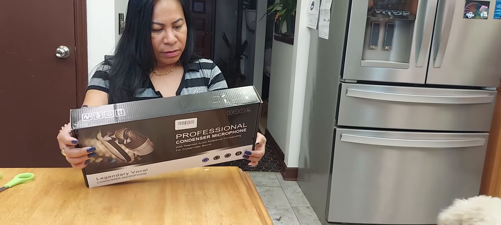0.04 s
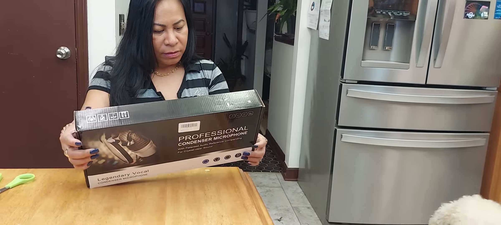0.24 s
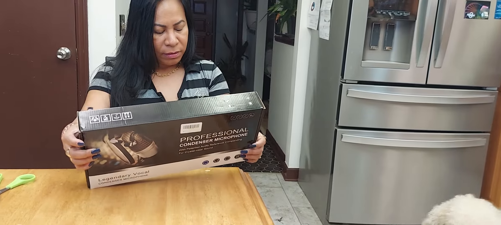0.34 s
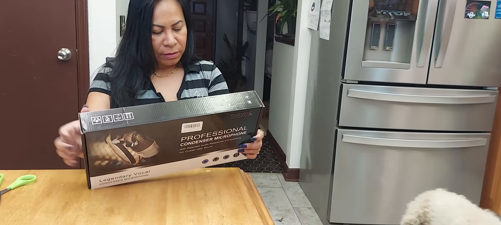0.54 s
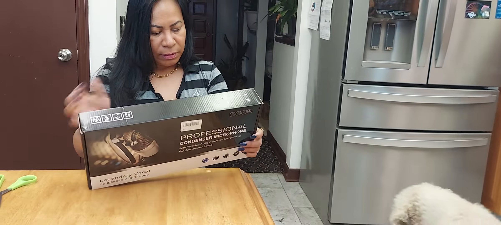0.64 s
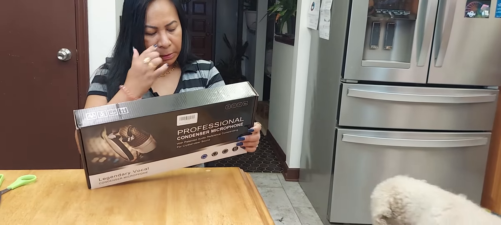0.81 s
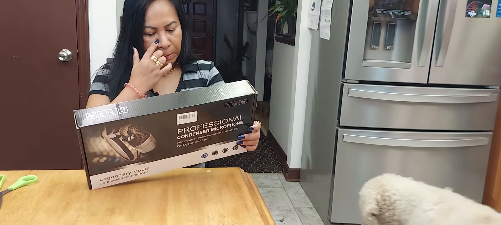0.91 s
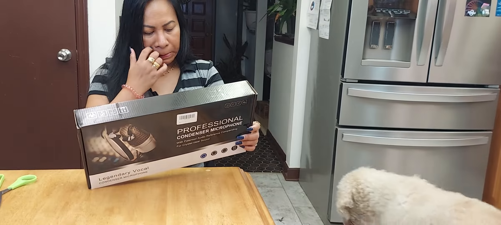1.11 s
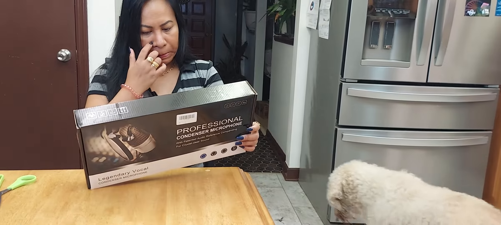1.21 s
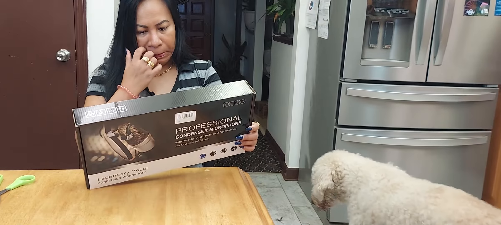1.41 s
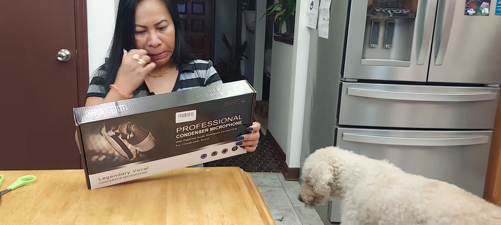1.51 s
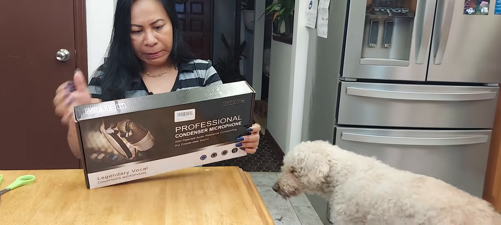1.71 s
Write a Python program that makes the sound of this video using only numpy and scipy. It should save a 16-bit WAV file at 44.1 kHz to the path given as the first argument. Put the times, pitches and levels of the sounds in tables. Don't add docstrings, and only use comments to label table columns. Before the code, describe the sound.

Hard nail clicks and soft finger bumps on a cardboard box, fridge humming faintly behind

```python
import sys
import numpy as np
from scipy import signal
from scipy.fft import rfft, irfft, next_fast_len
from scipy.io import wavfile
from scipy.ndimage import uniform_filter1d

SR = 44100
rng = np.random.default_rng(int(sys.argv[2]) if len(sys.argv) > 2 else 0)


def voltage_ratio(decibels):
    exponent = np.asarray(decibels, float) / 20
    return 10 ** exponent


def persist_wave(psi):
    counts = np.round(np.clip(psi, -1, 1) * 32767).astype(np.int16)
    wavfile.write(sys.argv[1], SR, np.atleast_2d(counts).T)


N = 77175

# f/Hz, density/dB
HISS_SPECTRUM = [(15, -51.5), (30, -32), (70, -7.5), (150, -18), (600, -19.5), (850, -36.5), (2500, -41),
                 (16000, -48.5)]
# f/Hz, width/Hz, level/dB
FRIDGE_BANDS = [
    (76.9, 30, -80),
    (1560, 150, -78.5),
    (13180, 2500, -81),
]
# f/Hz, correlation/1
LIKENESS = [(60, .6), (200, 0.52), (700, 0.94), (1500, 0.17), (5000, 0.1), (16000, .1)]
# f/Hz, gain/dB
PORT_COLOUR = [(6500, -3.5), (7800, 5.5), (9300, -5.5), (11000, -2), (13300, 0.5), (15500, 1)]
# f/Hz, gain to the left/dB
LEFT_GAIN = [(60, 1.5), (300, 1), (700, 0), (3000, 0.5), (8000, -1.1)]
# f/Hz, density/dB
TAIL_SPECTRUM = [(120, -69), (300, -18), (1100, -19.5), (1520, -5), (2800, -9), (3800, -4.5), (6000, -6.5),
                 (16500, -17)]
# f/Hz, t60/s
ROOM_T60 = [(300, 0.79), (1500, 0.5), (4000, 0.39), (8000, 0.32), (14000, 0.3)]
# delay/s, peak over tail/dB
WALL_ECHOES = [
    (.0073, 8),
    (.0143, 4),
]
# t of top/s, swell/s, fall/s, level/dB, brightness tilt/(dB/octave), shine/dB
FINGER_SLIDES = [
    (.4, .1, .07, -62, 4, 6),
    (.497, .04, .08, -55, 0, 5),
    (.2, .04, .05, -74, 1.5, 0),
    (1.165, .04, .09, -64, -7, 0),
    (1.75, .03, .05, -61, -2, 0),
    (1.19, .03, .05, -75, 3, 8),
    (1.145, .015, .02, -76, 3, 8),
    (.5, .05, .08, -64, -10, 0),
    (.645, .03, .05, -80, 3, 8),
    (1.742, .015, .02, -65, -10, 0),
]
# t/s, level/dB, f/Hz, t60/s, rise/s
BOX_GRIPS = [(.0, -55.5, 520, 0.98, 0.072), (.09, -58, 503, 0.55, 0.0023), (.207, -49.5, 435, 0.34, 0.0023),
             (0.233, -54.5, 564, 0.83, 0.0037), (.234, -46, 1460, 0.33, 0.0073),
             (0.051, -63, 208, 0.67, 0.023), (0.289, -52, 294, 0.31, 0.0071),
             (0.352, -58, 488, 0.25, 0.005), (.478, -61, 600, 0.33, 0.0034), (.79, -71, 1900, .3, .003),
             (.608, -68, 1420, 0.5, .003), (0.788, -67, 850, .25, .003), (1.15, -63, 1950, .35, .01),
             (-.01, -56, 1600, .4, .003), (0.85, -61.5, 1500, 0.16, 0.0018), (1.189, -70, 389, 0.29, 0.021),
             (1.415, -51, 780, 0.19, 0.013), (1.42, -38, 2200, 0.24, 0.013), (1.636, -69, 484, 0.4, 0.0035),
             (1.712, -61, 475, 0.56, .004)]
# t/s, level/dB, f/Hz, t60/s, rise/s
PANEL_TONES = [
    (1.412, -53.5, 1200, 0.32, 0.0094),
    (1.412, -53, 2080, 0.13, 0.0074),
    (1.41, -43, 2410, 0.22, 0.011),
    (1.412, -40.5, 3400, 0.24, 0.017),
    (.235, -45, 2050, 0.19, 0.0037),
    (.235, -48, 1500, 0.48, 0.005),
    (.878, -60, 1230, 0.3, 0.0066),
    (1.155, -67, 1900, 0.33, .005),
    (1.6375, -59.5, 1457, 0.15, .001),
]
# t/s, peak/dB, f/Hz, length/s
SMALL_TICKS = [(.160, -70, 4700, .0012), (.160, -69, 7700, .001), (.191, -67, 4700, .0012),
               (.191, -68, 7500, .001), (.215, -68, 4600, .0012), (.2372, -27, 11300, .0002),
               (.2361, -31, 7300, .0003), (.4705, -53, 4500, .0003), (.5097, -55, 13200, .0003),
               (.8826, -24, 7600, .00015), (.8838, -36, 5000, .0003), (.8928, -31, 7600, .0003),
               (.9412, -30, 11800, .0002), (.9494, -31, 7400, .0003), (1.4071, -40, 11000, .0002),
               (1.4100, -41, 11000, .0002), (1.4149, -30, 7600, .0003), (1.4181, -36, 7600, .0004),
               (1.4210, -35, 7600, .0005), (1.4227, -33, 4000, .0002), (1.4305, -35, 7600, .0003),
               (1.4356, -34, 6000, .0002), (1.7110, -52, 520, .0006), (1.7110, -58, 1800, .0004),
               (1.7110, -66, 4200, .0003), (1.7110, -66, 7500, .0003), (1.6385, -56, 1450, .0012),
               (.8525, -59, 1500, .0008)]
# t/s, peak/dB, f/Hz, length/s
BOX_BUMPS = [(.075, -60, 535, .015), (.103, -57, 415, .012), (.115, -61, 665, .015), (.16, -61, 505, .008),
             (.222, -56, 400, .008), (.242, -51, 525, .007), (.241, -54, 690, .006), (.277, -49, 200, .012),
             (.25, -56, 86, .015), (.305, -56, 395, .01), (.368, -55, 285, .008), (.37, -54, 480, .008),
             (.49, -54, 640, .01), (.488, -57, 480, .008), (.52, -63, 430, .02), (.8, -64, 710, .008),
             (.827, -62, 520, .006), (.855, -62, 320, .006), (.855, -64, 700, .005), (1.01, -66, 400, .006),
             (1.21, -65, 390, .02), (1.165, -64, 1590, .008), (1.432, -54, 786, .012),
             (1.47, -58, 1110, .015), (1.425, -55, 1340, .012), (1.44, -49, 1870, .025),
             (1.73, -59, 510, .012), (1.725, -63, 340, .012), (1.67, -65, 500, .006),
             (.89, -55, 1530, .012), (.105, -62, 300, .015), (.49, -60, 78, .02), (.6, -66, 80, .02),
             (.77, -65, 82, .02), (.65, -70, 150, .015)]
# f/Hz, gain/dB
NAIL_SPECTRUM = [(300, -21), (1000, -8), (1600, -0.5), (2800, -33), (4500, -4.5), (8000, 5.5), (10000, 1),
                 (16000, -19.5)]
# t/s, direct/dB, port ring/dB, room/dB, brightness tilt/(dB/octave)
NAIL_CLICKS = [(.2310, -22, -9.5, -36, 2.5), (.2352, -22, -5.5, -34.5, 2), (.2370, -34, -19, -50, 6),
               (.2422, -39.5, -25, -76, 3), (.4706, -66, -44, -71, 4.5), (0.8491, -66, -80, -72, -11),
               (0.8668, -57, -50, -75, 4), (.8755, -25.5, -25, -37, 0.5), (.8774, -24.5, -24, -50, 2),
               (.9412, -23, -25, -42, 2), (1.0063, -48, -55, -63.5, -4), (1.0370, -55.5, -48, -80, -4),
               (1.4071, -38, -42, -43, -0.5), (1.4100, -38, -44, -43, -1), (1.7110, -60, -65, -72, -4)]
# t/s, level/dB, rise/s, brightness tilt/(dB/octave), shine/dB
FAR_SCUFFS = [
    (-.03, -46.5, 0.0041, -4, -4),
    (0.16, -74, 0.0021, 12, -5),
    (0.188, -57, 0.013, -5.5, 21.5),
    (.24, -35.5, 0.016, 6.5, 1.5),
    (0.479, -68.5, 0.014, 2, 8),
    (.63, -76, 0.0054, 5, 6.5),
    (1.15, -65, 0.0052, -4, 10.5),
    (1.412, -37.5, 0.0059, 2, -15.5),
    (1.734, -58.5, 0.0065, 10.5, 15.5),
]

TOP_HZ = 15850
LAG_S = np.array([[.00018], [0]])
LEFT_RIGHT = np.array([[1], [-1]])


def unit(x):
    return x / np.sqrt(np.mean(x ** 2) + 1e-20)


def along(points, hz):
    f, v = np.transpose(points)
    return np.interp(np.log(hz + 1), np.log(f + 1), v)


def tilt(hz, db_per_octave):
    return voltage_ratio(db_per_octave * np.log2(np.clip(hz, 300, None) / 4000))


def shine(hz, db):
    return voltage_ratio(db * np.clip(hz / 4000 - 2, 0, 1))


def filtered(x, response):
    m = next_fast_len(x.shape[-1] + 2048)
    spectrum = rfft(x, m) * response(np.fft.rfftfreq(m, 1 / SR))
    return irfft(spectrum, m)[..., :x.shape[-1]]


def flicker(size, count):
    return unit(uniform_filter1d(rng.standard_normal(count), size=size))


def decay(db, t60_s, rise_s, t):
    return voltage_ratio(db - 60 * t / np.clip(t60_s, .05, .55)) * (1 - np.exp(-t / rise_s))


def noise(gain, size):
    def mid_side_gain(hz):
        turn = np.arccos(np.clip(along(LIKENESS, hz), -1, 1)) / 2
        colour = gain(hz) * voltage_ratio(along(PORT_COLOUR, hz)) * (hz < TOP_HZ)
        return colour * np.array([np.cos(turn), np.sin(turn)])

    mid, side = filtered(rng.standard_normal((2, size)), mid_side_gain)
    left = np.roll(mid + side, round(LAG_S[0, 0] * SR))
    return unit(np.array([left, mid - side]))


def add(out, x, s):
    i = round(s * SR)
    x = x[:, max(-i, 0):N - i]
    out[:, max(i, 0):max(i, 0) + x.shape[1]] += x


def kitchen():
    out = voltage_ratio(-70.5) * noise(lambda f: voltage_ratio(along(HISS_SPECTRUM, f)), size=N)
    for hz, width_hz, db in FRIDGE_BANDS:
        out += voltage_ratio(db) * noise(lambda f: np.exp(-((f - hz) / width_hz) ** 2), size=N)
    return out


def room_tail(tilt_db, rise_s, shine_db=0):
    x = noise(lambda hz: voltage_ratio(along(TAIL_SPECTRUM, hz)) * tilt(hz, tilt_db) * shine(hz, shine_db),
              size=SR * 3 // 4)
    hz, frame_s, z = signal.stft(x, SR, nperseg=256)
    fade = voltage_ratio(-60 * frame_s / along(ROOM_T60, hz)[:, None])
    x = signal.istft(z * fade, SR, nperseg=256)[1]
    t = np.arange(x.shape[1]) / SR
    clump_db, clump_s = 3, .06
    clumps_db = clump_db * np.exp(-t / clump_s) * flicker(size=30, count=len(t))
    return filtered(x * voltage_ratio(clumps_db) * (1 - np.exp(-t / rise_s)), lambda hz: hz < TOP_HZ)


def far_scuffs():
    out = np.zeros((2, N))
    for s, db, rise_s, tilt_db, shine_db in FAR_SCUFFS:
        add(out, voltage_ratio(db) * room_tail(tilt_db, rise_s, shine_db), s)
    return out


def finger_slides():
    out, t = np.zeros((2, N)), np.arange(-SR // 4, SR // 4) / SR
    edge_db, grain_db = -18, 1.5
    for top_s, rise_s, fall_s, db, tilt_db, shine_db in FINGER_SLIDES:
        swell_db = edge_db * np.where(t < 0, -t / rise_s, t / fall_s)
        swell_db += grain_db * flicker(size=90, count=len(t))
        rustle = noise(lambda hz: tilt(hz, tilt_db) * shine(hz, shine_db) * (hz > 700), size=len(t))
        add(out, voltage_ratio(db + swell_db) * rustle, top_s + t[0])
    return filtered(out, lambda hz: hz < TOP_HZ)


def cupboard_panels():
    out, t = np.zeros((2, N)), np.arange(SR // 2) / SR
    wander_rad = .9
    for s, db, hz, t60_s, rise_s in PANEL_TONES:
        drift = unit(uniform_filter1d(rng.standard_normal((2, len(t))), size=600, axis=1))
        phase = 2 * np.pi * hz * (t - LAG_S) + wander_rad * (drift[0] + drift / 3)
        add(out, decay(db, t60_s, rise_s, t) * np.sqrt(2) * np.sin(phase), s)
    return out


def box_grips():
    out, t = np.zeros((2, N)), np.arange(SR // 2) / SR
    width_over_pitch, uneven_db = .28, 3
    for s, db, hz, t60_s, rise_s in BOX_GRIPS:
        body = noise(lambda f: 1 / (1 + ((f - hz) / (width_over_pitch * hz)) ** 2), size=len(t))
        level_db = db + uneven_db * flicker(size=500, count=len(t))
        add(out, decay(level_db, t60_s, rise_s, t) * body, s)
    return out


def ticks_and_bumps():
    out, t = np.zeros((2, N)), np.arange(-SR // 10, SR // 10) / SR
    late = t - LAG_S
    for s, db, hz, length_s in [*SMALL_TICKS, *BOX_BUMPS]:
        bell = np.exp(-(late / length_s) ** 2 / 2)
        burst = bell * np.cos(2 * np.pi * hz * late + rng.uniform(0, 2 * np.pi))
        left_db = -1.5 * (hz > 3000)
        add(out, voltage_ratio(db + left_db * LEFT_RIGHT) * burst, s + t[0])
    return out


def nail_clicks():
    out = np.zeros((2, N))
    t = np.arange(-64, 192) / SR - LAG_S
    direct_gain_db = np.array([[4], [7]])
    ring_hz, ring_gain_db, ring_s = np.array([[12000], [13200]]), np.array([[-14], [0]]), .00022
    ring = np.exp(-(t / ring_s) ** 2 / 2) * np.sin(2 * np.pi * ring_hz * t) * voltage_ratio(ring_gain_db)
    fill_s, wall_top_hz = .0047, 9500
    for s, direct_db, ring_db, room_db, tilt_db in NAIL_CLICKS:
        start_s = s + t[1, 0]
        impulse = np.sinc(t * SR) * rng.choice([-1, 1])
        tick = filtered(impulse, lambda hz: voltage_ratio(along(NAIL_SPECTRUM, hz)) * tilt(hz, tilt_db)
                        * (hz < TOP_HZ + 900))
        tick = tick / np.abs(tick).max(axis=1, keepdims=True) * voltage_ratio(direct_gain_db)
        add(out, voltage_ratio(direct_db) * tick + voltage_ratio(ring_db) * ring, start_s)
        add(out, voltage_ratio(room_db) * room_tail(tilt_db, fill_s), s)
        echo = filtered(tick, lambda hz: 1 / (1 + (hz / wall_top_hz) ** 8))
        for delay_s, db in WALL_ECHOES:
            add(out, voltage_ratio(room_db + db) * echo, start_s + delay_s)
    return out


def scene():
    background = kitchen() + far_scuffs()
    hands = finger_slides() + cupboard_panels() + box_grips() + ticks_and_bumps()
    return background + hands + nail_clicks()


def roll_off(x):
    return signal.sosfilt(signal.butter(12, 16790, fs=SR, output="sos"), x)


def record(dry):
    mix = filtered(dry, lambda hz: voltage_ratio(along(LEFT_GAIN, hz) * LEFT_RIGHT))
    return roll_off(mix)


dry = scene()
out = record(dry)
persist_wave(out)
```